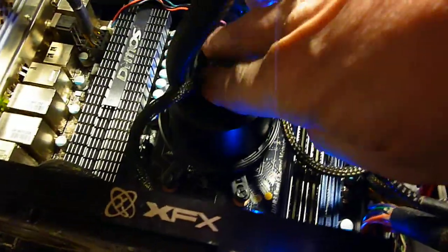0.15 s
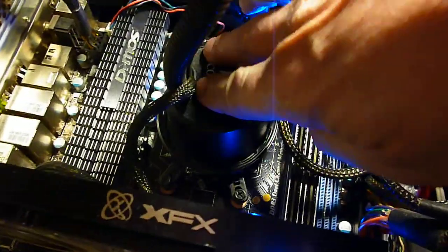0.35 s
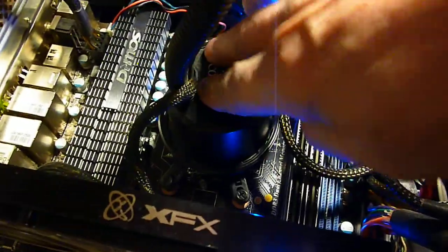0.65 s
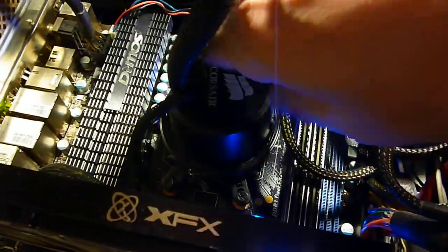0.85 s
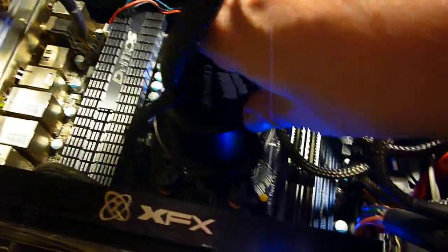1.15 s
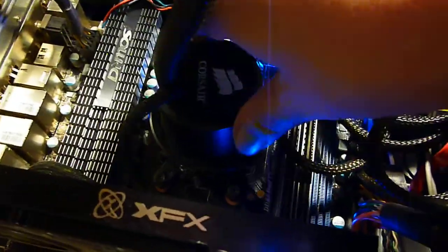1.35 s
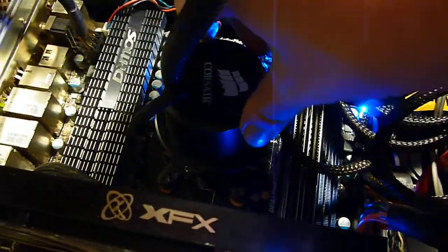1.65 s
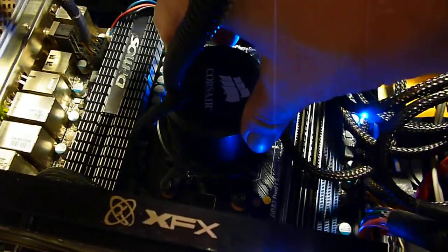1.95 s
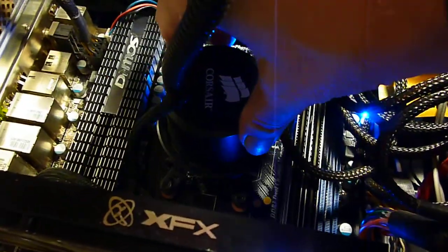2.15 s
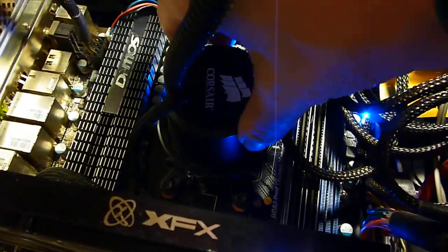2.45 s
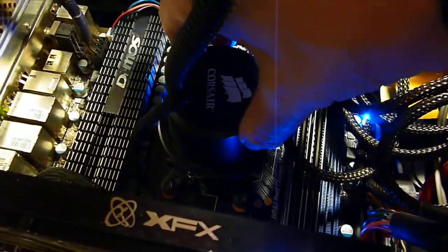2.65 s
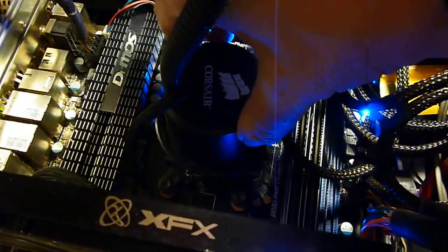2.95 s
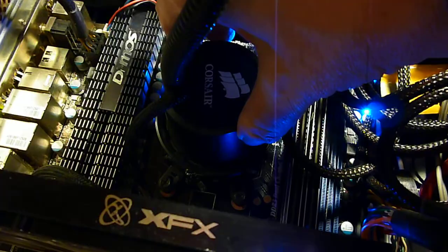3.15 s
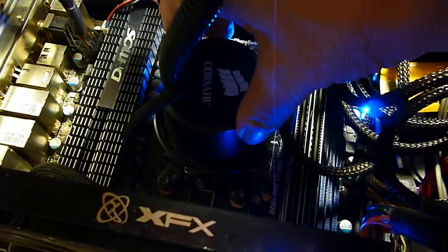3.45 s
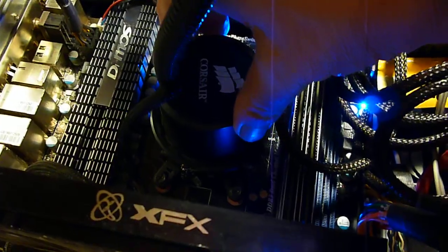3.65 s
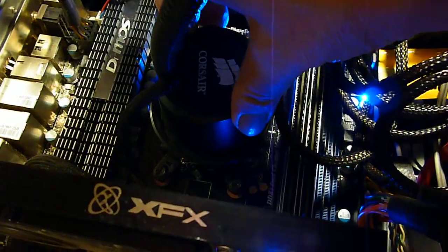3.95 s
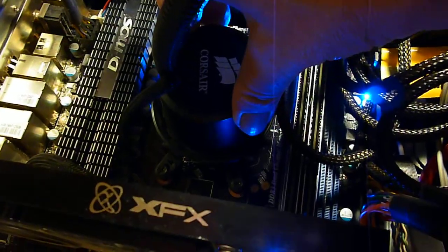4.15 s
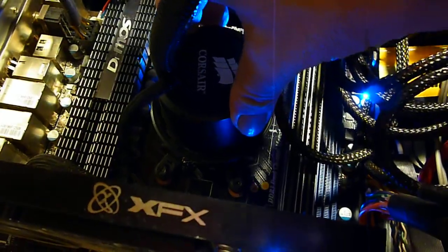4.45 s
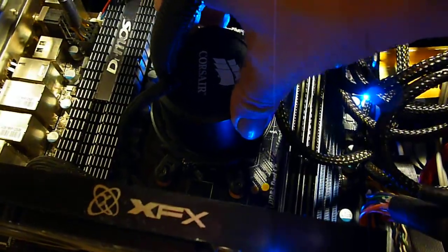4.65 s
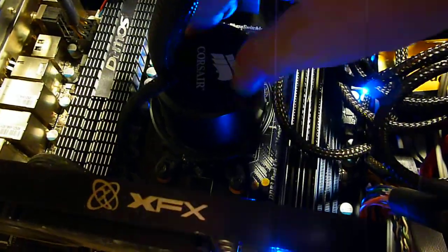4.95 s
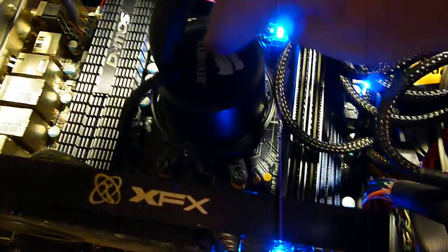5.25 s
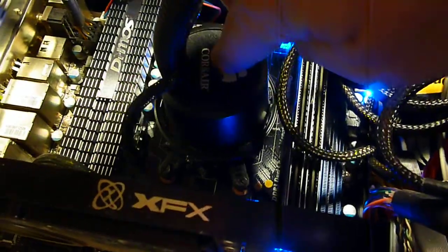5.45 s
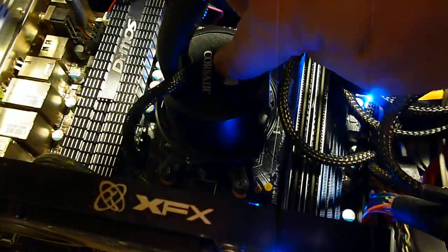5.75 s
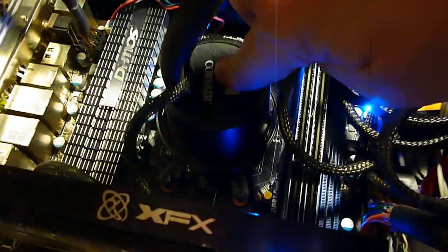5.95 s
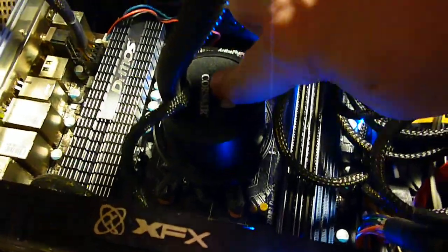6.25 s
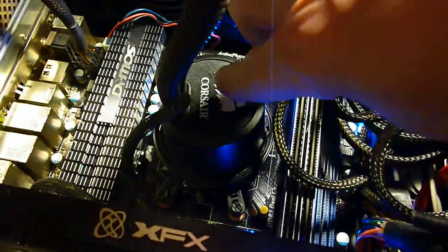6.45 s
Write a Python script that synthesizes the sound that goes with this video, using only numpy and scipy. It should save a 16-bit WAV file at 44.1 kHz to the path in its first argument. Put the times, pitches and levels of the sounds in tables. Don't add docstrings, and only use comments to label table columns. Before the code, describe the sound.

A small worn pump buzzes loudly close to the microphone inside a computer case, already running at the start and never stopping. Its hum is nasal and mid-pitched, around 500 Hz, pulsing about fifty times a second, with bright gritty bearing rattle and thin metallic ringing above. At about 0.4 to 1 seconds the tone dips and changes colour under the hand, then holds fairly steady until 2.4. Around 2.5 it wavers, and near 3.2 it rises slightly while the rattle thins and returns. From 3.6 the rotor bogs down; from 3.8 to 4.6 rapid hollow knocks and a singing housing growl slow to roughly thirty-five a second. It speeds up from 4.7, regaining its buzz by 5.3. A smaller sag with rougher, brighter scraping comes around 6.2, then recovers before the end at 6.6. Fan hiss, low rumble and faint steady whines remain behind.

```python
import sys
import numpy as np
from scipy import signal
from scipy.fft import rfft, irfft
from scipy.io import wavfile
from scipy.ndimage import uniform_filter1d

SR = 44100
rng = np.random.default_rng(int(sys.argv[2]) if len(sys.argv) > 2 else 0)


def put_to_file(sound):
    columns = np.atleast_2d(sound).T
    safe = np.clip(columns, -1, 1)
    whole_steps = np.round(safe * 32767)
    wavfile.write(sys.argv[1], SR, whole_steps.astype(np.int16))


def decibels_to_gain(level_db):
    exponent = np.asarray(level_db, float) / 20
    return 10 ** exponent


N = 291501

# (time [s], pulse depth [dB], looseness [scatter of contacts, turns / 1000])
HAND_GRIP = [(0, 5.5, 0.12), (.25, 11.5, 0.71), (.5, 6, 0.47), (1.301, 6.5, 0.17), (1.598, 4, 0.19),
             (2.1, 7, 0.14), (2.499, 6.5, 0.59), (3.001, 16, 0.6), (3.3, -7.5, 0.19), (3.6, 7, 1.7),
             (4.1, 2, 1.8), (4.35, 6.5, 2.8), (5.05, 10.5, 1.5), (5.35, 3.5, 0.37), (5.652, 4, 0.087),
             (5.9, 4.5, 0.75), (6.2, 2.5, 0.66), (6.61, 8, 0.36)]
# (time [s], drag level [dB], brightness [dB])
WALL_LEAN = [(0, -51, 5), (.4, -48, 0), (.8, -53, -2), (1.8, -53, 0), (2.5, -48.5, 0), (3.4, -49.5, 0.5),
             (3.62, -38, 5.5), (3.73, -46, -2), (3.8, -58, 6.5), (3.97, -57, -2), (4.1, -62, -3),
             (4.25, -57, 1), (4.42, -57, 5), (4.6, -57, -2), (4.66, -40, -11), (4.78, -42.5, -8),
             (4.9, -38, -9), (5.02, -42.5, -7), (5.2, -58, 1), (5.5, -48, 9), (5.85, -46, 4.5),
             (6.08, -52, -4), (6.19, -42.5, 9.5), (6.3, -51.5, -2), (6.61, -40, 2.5)]
ROUGH_SPOTS = [-0.51, -0.259, 0]


def level(x, db):
    return x * decibels_to_gain(db) / np.sqrt(np.mean(x ** 2))


def band(x, hz, width_hz):
    return signal.lfilter(*signal.iirpeak(hz, hz / width_hz, SR), x)


def colour(x, points):
    hz, db = np.transpose(points)
    log_hz = np.log(np.fft.rfftfreq(4096, 1 / SR) + 1)
    log_gain = np.interp(log_hz, np.log(hz), db) * np.log(10) / 20
    cepstrum = irfft(log_gain)
    cepstrum[1:2048] *= 2
    cepstrum[2049:] = 0
    return signal.fftconvolve(x, irfft(np.exp(rfft(cepstrum))))[:N]


def curves(table):
    s, *columns = np.transpose(table)
    return [np.interp(np.arange(N) / SR, s, c) for c in columns]


def per_turn(turns, s, values):
    turn_s = np.interp(np.arange(int(turns[-1]) + 2), turns, np.arange(N) / SR)
    return np.interp(turn_s, s, values)


def walk(steps, size, count):
    w = rng.standard_normal((count, size))
    w = uniform_filter1d(uniform_filter1d(w, int(steps)), int(steps))
    return w / w.std()


def drifts(rate, count):
    w = walk(100 / rate, size=700, count=count)
    return np.array([np.interp(np.arange(N) / SR, np.arange(700) / 100, row) for row in w])


def contacts(turns, angle, db, creep, creep_db, shake, shake_db, memory):
    count, size = db.shape
    at = angle[:, None] + np.arange(size)
    at = at + creep * walk(memory, size, count) + shake * rng.standard_normal((count, size))
    force_db = db + creep_db * walk(memory, size, count) + shake_db * rng.standard_normal((count, size))
    place = np.interp(at, turns, np.arange(N)).ravel()
    force = decibels_to_gain(force_db).ravel() * (at.ravel() < turns[-1])
    taps = np.floor(place)[:, None] + np.arange(-5, 7)
    away = taps - place[:, None]
    click = np.sinc(away) * np.cos(np.pi * away / 12) ** 2
    taps = np.clip(taps, 0, N - 1).astype(int)
    return np.bincount(taps.ravel(), (force[:, None] * click).ravel(), N)


def shaft_speed():
    # (time [s], shaft speed [turns/s])
    speed = [(0, 52.2), (.31, 52.22), (.52, 49.5), (.72, 49.8), (1.05, 50.78), (2.03, 50.79), (2.5, 49.92),
             (3.2, 55.22), (3.45, 54.53), (3.69, 51), (3.8, 47.9), (3.92, 46.1), (4.2, 39.9), (4.44, 35.93),
             (4.62, 35.28), (4.8, 40.8), (4.93, 43.68), (5.28, 48.79), (5.67, 50.27), (5.9, 49.17),
             (6.22, 46.57), (6.32, 46.74), (6.61, 49.5)]
    inertia_s = .1
    return uniform_filter1d(curves(speed)[0], int(inertia_s * SR))


def shifts():
    # (time [s], length [s], hum change [dB], rattle change [dB])
    finger_moves = [(0.37, 0.02, -1.5, 1), (0.42, 0.041, -8.5, -2), (0.77, 0.044, -1.5, 0),
                    (0.92, 0.14, -6, 0), (1.223, 0.031, -3, -1.5), (1.666, 0.072, 0, -1),
                    (2.532, 0.088, -3, 2.5), (2.615, 0.081, -7.5, -2.5), (3.305, 0.036, 0.5, 1),
                    (3.43, 0.062, 3, -0.5), (3.714, 0.046, 0.5, 0), (3.89, 0.014, 5, -2.5),
                    (4.203, 0.042, 5.5, 1), (4.312, 0.038, 7, -4.5), (4.682, 0.035, 4, -4.5),
                    (4.936, .1, 2.5, -3.5), (5.12, 0.04, 1.5, -1), (5.475, 0.077, 1.5, 2),
                    (5.69, 0.046, -1.5, 0), (6.182, 0.037, -2, 2), (6.272, 0.032, 2.5, 0.5),
                    (6.389, 0.052, -2, -2)]
    s, length, *db = np.transpose(finger_moves)
    grid = np.arange(0, N, 200)
    bump = np.exp(-((grid / SR - s[:, None]) / length[:, None]) ** 2)
    return [np.interp(np.arange(N), grid, d @ bump) for d in db]


def housing(shaft_hz, shift_db):
    # (time [s], resonance [Hz], hum level [dB], hose ring level [dB])
    pressure = [(0, 504.4, -32.5, -48.5), (.3, 489, -32, -49), (.37, 474, -30.5, -44),
                (.45, 526, -38, -37.5), (.72, 530, -36, -38.5), (1.05, 453.6, -35.5, -46.5),
                (2.03, 455.4, -34, -45), (2.4, 515, -43, -37.5), (2.62, 468.6, -29, -38),
                (2.75, 488, -31.5, -45.5), (3.2, 542, -28, -41), (3.62, 504, -31, -37),
                (3.8, 530, -47, -36.5), (4.72, 524, -41, -41.5), (4.9, 480, -38.5, -55),
                (5.02, 501.4, -42, -46), (5.14, 500, -37.5, -36.5), (5.28, 504.7, -32, -39.5),
                (5.9, 515.4, -34, -38), (6.15, 448, -39, -37.5), (6.21, 460, -42, -35.5),
                (6.27, 470, -43, -33), (6.36, 492.8, -32.5, -35.5), (6.61, 518, -32, -39)]
    hose_share_db = (-15.5, -3, 1.5)
    width_hz = 36.3
    edge_hz = 506
    centre_hz, hum_db, hose_db = curves(pressure)

    def strength(m, share_db):
        near = decibels_to_gain(hum_db) / np.sqrt(1 + ((m * shaft_hz - centre_hz) / width_hz) ** 4)
        lent = decibels_to_gain(hose_db + share_db) / (1 + (edge_hz / (m * shaft_hz)) ** 16)
        return 20 * np.log10(np.hypot(near, lent)) + shift_db

    strong_db = {m: strength(m, share_db) for m, share_db in zip((9, 10, 11), hose_share_db)}
    strong_db[13] = strength(13, 0)
    return strong_db


def hum(turns, shaft_hz, strong_db, board_db):
    # (frequency [multiples of board_step_hz], level [dB])
    board_response = [(1, -30.5), (2, -28), (3, -19), (4, -14), (5, -20), (6, -20.5), (7, -13.5),
                      (8, -26.5), (9, -8.5), (10, -20), (11, -8.5), (12, -11), (13, -9), (14, -8.5),
                      (15, -13), (16, -19.5), (17, -12), (18, -30), (19, -15.5), (20, -33.5), (21, -12.5),
                      (22, -26), (23, -23), (24, -19.5), (25, -17.5), (26, -15), (27, -22), (28, -16),
                      (29, -28.5), (30, -19.5), (31, -40.5), (32, -17), (33, -38.5), (34, -36), (35, -21),
                      (36, -41.5)]
    board_step_hz = 50.75
    # (time [s], level [dB])
    grip_damping = [
        (0, 5),
        (2.5, 5),
        (3.0, -4),
        (3.7, -5.5),
        (3.78, 11),
        (4.66, 3),
        (5.1, -2),
        (5.6, -1),
        (5.95, 2),
        (6.61, -6.5),
    ]
    step, response_db = np.transpose(board_response)
    count = len(step)
    grid, coarse = np.arange(0, N, 400), np.arange(0, N, 6)
    waver = walk(33, size=len(grid), count=2 * count).reshape(2, count, -1)
    start = rng.random(count)
    start[7:13] = -.3 * step[7:13] + 0.042 * (step[7:13] - 10) ** 2
    board_db = board_db[grid] - 0.59 * np.maximum(48 - shaft_hz[grid], 0)
    seized_db = np.interp(grid / SR, *np.transpose(grip_damping))
    upper_db = 0.36 * strong_db[13][grid] + 0.74 * board_db + 2.5 + seized_db
    out = 0
    for k, m in enumerate(step):
        if m in strong_db:
            own_db = strong_db[m][grid] + .3 * seized_db + waver[1, k]
        else:
            own_db = np.interp(m * shaft_hz[grid] / board_step_hz, step, response_db) + 3.3 * waver[1, k]
            own_db = own_db + (upper_db if 12 <= m <= 18 else board_db)
        phase = m * turns[coarse] + np.interp(coarse, grid, start[k] + 0.11 * waver[0, k])
        gain = np.interp(coarse, grid, np.sqrt(2) * decibels_to_gain(own_db))
        out = out + gain * np.sin(2 * np.pi * phase)
    return signal.resample_poly(out, 6, 1)[:N]


def rattle(turns, modes, db, heavy_side, depth, braked, count):
    # (time [s], extra pulse depth [dB])
    one_sided = [
        (4.2, 0.5),
        (4.4, 3),
        (5.0, 3.5),
        (5.15, 1),
    ]
    s, depth_db, loose = np.transpose(HAND_GRIP)
    depth_db = depth * per_turn(turns, s, depth_db) + braked * per_turn(turns, *np.transpose(one_sided))
    angle = (np.arange(count) + rng.random(count)) / count
    side = np.cos(2 * np.pi * (angle - heavy_side))[:, None]
    strength = depth_db * side - 0.045 * depth_db ** 2 + 3.8 * rng.standard_normal((count, 1))
    shake = 0.00096 * np.abs(per_turn(turns, s, loose))
    grit = contacts(turns, angle, strength, creep=0.0029, creep_db=2.0, shake=shake, shake_db=0.5, memory=25)
    ring = sum((-1) ** k * decibels_to_gain(m_db) * band(grit, hz, w) for k, (hz, w, m_db) in enumerate(modes))
    centre_hz = np.mean(np.array(modes)[:, 0])
    broad = band(band(grit, centre_hz, 0.17 * centre_hz), centre_hz, 0.12 * centre_hz)
    ring = level(ring, 0) + level(broad, -4.5)
    return level(ring, 0) * decibels_to_gain(db)


def ticks(turns, db):
    angle = 0.5 + 0.11 * rng.random(5)
    even_db = np.zeros((5, int(turns[-1]) + 2))
    hits = contacts(turns, angle, even_db, creep=0.031, creep_db=5, shake=.004, shake_db=5, memory=6.5)
    return level(band(band(hits, 6400, 2100), 5700, 2500), 0) * decibels_to_gain(db)


def bearing_ring(turns):
    # (start [s], end [s], mode [Hz], level [dB])
    firm_spots = [(0, 0.304, 4746, -44), (0.848, 1.02, 4810, -40), (1.02, 1.182, 4817, -37.5),
                  (1.26, 1.7, 4815, -38), (1.724, 2.08, 4760, -47), (2.078, 2.545, 4815, -42.5),
                  (2.553, 2.75, 4818, -52), (3.21, 3.674, 4780, -43), (3.85, 4.08, 4827, -48),
                  (5.4, 5.9, 4790, -47), (6.3, 6.61, 4828, -46), (0, .58, 5674, -41.5),
                  (2.0, 2.3, 5630, -51), (5.302, 5.721, 5747, -48), (5.845, 6.3, 5650, -46.5),
                  (.27, 0.755, 6510, -40.5), (1.1, 1.248, 6420, -46), (6.35, 6.607, 6460, -48.5),
                  (0.853, 1.1, 5960, -44), (1.28, 1.4, 5960, -46.5), (2.094, 2.599, 5960, -44),
                  (3.55, 3.848, 5960, -45), (5.75, 6.0, 5960, -43), (1.26, 1.7, 5510, -49),
                  (5.08, 5.55, 5510, -46), (6.4, 6.609, 5510, -45)]
    width_hz, rest_db = 70, -53
    lag_s = .0043
    even_db = np.zeros((1, int(turns[-1]) + 2))
    hits = contacts(turns, np.array([.6]), even_db, creep=0.0036, creep_db=-4.0,
                    shake=0.00027, shake_db=1.5, memory=19)
    grid = np.arange(0, N, 200)
    out = 0
    for k, mode_hz in enumerate(sorted({round(row[2], -2) for row in firm_spots})):
        rows = [row for row in firm_spots if round(row[2], -2) == mode_hz]
        hz = np.mean([row[2] for row in rows])
        gain = sum(decibels_to_gain(db) * (grid / SR > start) * (grid / SR <= end) for start, end, _, db in rows)
        gain = np.interp(np.arange(N), grid, uniform_filter1d(gain, size=10) + decibels_to_gain(rest_db))
        late = np.roll(hits, int(k * lag_s * SR))
        out = out + level(band(band(late, hz, width_hz), hz, 6.3 * width_hz), 0) * gain
    return out


def blows(turns):
    # (time [s], peak level [dB], ring [Hz])
    strikes = [(3.768, -27, 635), (3.79, -17, 630), (3.81, -15, 633), (3.831, -13, 638),
               (3.852, -14.5, 630), (3.873, -17, 633), (3.894, -14.5, 650), (3.915, -12, 638),
               (3.931, -19.5, 738.3), (3.937, -11.5, 630), (3.952, -15, 712), (3.959, -14.5, 634),
               (3.974, -15, 644), (3.981, -19, 641), (3.997, -18, 657), (4.005, -10.5, 646),
               (4.023, -18.5, 580), (4.033, -18.5, 796), (4.056, -20, 800), (4.081, -15.5, 614),
               (4.104, -19.5, 684), (4.129, -19, 574), (4.145, -23, 565), (4.152, -21, 654.4),
               (4.179, -25, 530), (4.204, -20, 643), (4.233, -24, 773), (4.258, -19.5, 770),
               (4.285, -22.5, 541), (4.31, -20.5, 538.5), (4.33, -24.5, 662.3), (4.337, -20.5, 768),
               (4.357, -21.5, 674), (4.366, -19.5, 783), (4.385, -19, 638), (4.393, -17.5, 771.5),
               (4.412, -17.5, 635), (4.421, -18.5, 760), (4.441, -21.5, 622), (4.449, -16.5, 760),
               (4.469, -13.5, 630), (4.477, -18.5, 772.5), (4.498, -13.5, 610), (4.506, -18.5, 780),
               (4.526, -15.5, 610), (4.534, -18.5, 790), (4.562, -17.5, 770), (4.59, -16.5, 632),
               (4.618, -21, 633)]
    # (time [s], level [dB])
    linger = [
        (3.75, -4),
        (3.9, 0.5),
        (4.05, 3.5),
        (4.2, 4),
        (4.35, 3.5),
        (4.5, 1),
        (4.56, -3),
        (4.64, -7),
    ]
    sing_spots_db = [-3.5, -2, 0]
    early_s, early_turn = .013, .3
    rise_s, fall_s, trim_db, crack_db = 0.001, 0.0026, -2.5, -15.5
    s, db, hz = np.transpose(strikes)
    t = np.arange(N) / SR
    early = np.append(np.diff(s) < early_s, False)
    turn = np.interp(s[~early], t, turns)
    count = np.arange(len(turn))
    spot = count + np.polyval(np.polyfit(count, turn - count, 5), count)

    def place(turn):
        return (np.interp(turn, turns, t) * SR).astype(int)

    at = place(spot[np.cumsum(~early) - ~early] - early_turn * early)
    for kind in (early, ~early):
        db[kind] = uniform_filter1d(db[kind], size=2)
        hz[kind] = uniform_filter1d(hz[kind], size=5)
    age = np.arange(900) / SR
    shape = (1 - np.exp(-age / rise_s)) * np.exp(-age / fall_s)
    crack = decibels_to_gain(crack_db) * np.exp(-age / .0008) * np.sin(2 * np.pi * 1400 * age)
    body = shape / shape.max() * np.sin(2 * np.pi * hz[:, None] * age)
    ring = decibels_to_gain(db + trim_db)[:, None] * (body + crack)
    ring = np.bincount((at[:, None] + np.arange(900)).ravel(), ring.ravel(), N)
    force = decibels_to_gain(db[~early])
    hits = sum(np.bincount(place(spot + angle), force * decibels_to_gain(spot_db), N)
               for angle, spot_db in zip(ROUGH_SPOTS, sing_spots_db))
    low, high = wall(hits)
    sing = low + high * decibels_to_gain(0.76 * curves(WALL_LEAN)[1])
    sing = sing * np.sqrt(np.mean(ring ** 2) / np.mean(sing ** 2)) * decibels_to_gain(curves(linger)[0])
    return signal.sosfilt(signal.butter(3, 450, "high", fs=SR, output="sos"), ring + sing)


def drag(turns):
    drag_spots_db = [-2, -6, -0.5]
    main_knock_s = 3.871
    db, bright_db = curves(WALL_LEAN)
    angle = np.interp(main_knock_s * SR, np.arange(N), turns) % 1 + np.array(ROUGH_SPOTS)
    strength = np.array(drag_spots_db)[:, None] + np.zeros(int(turns[-1]) + 2)
    hits = contacts(turns, angle, strength, creep=.008, creep_db=2, shake=.003, shake_db=1.2, memory=8)
    low, high = wall(hits)
    return level(low, 0) * decibels_to_gain(db) + level(high, -1.5) * decibels_to_gain(db + bright_db)


def wall(hits):
    # (mode [Hz], width [Hz], level [dB])
    lower_modes = [(470, 50, -2.5), (543.6, 76, -2), (632, 79, 4.5)]
    upper_modes = [(709, 96, -9), (780, 60, 2), (874, 57, -3.5), (977, 110, -17.5)]
    return [sum((-1) ** k * decibels_to_gain(db) * band(band(hits, hz, w), hz, 2 * w) for k, (hz, w, db) in enumerate(modes))
            for modes in (lower_modes, upper_modes)]


def thrum():
    from_s, hz, width_hz, thrum_db = 2.58, 102, 65, -54.5
    on = uniform_filter1d(1. * (np.arange(N) > from_s * SR), 4000)
    return on * level(band(band(rng.standard_normal(N), hz, width_hz), hz, 2 * width_hz), thrum_db)


def fans(hiss_db, rumble_db):
    # (frequency [Hz], density [dB per Hz])
    air_spectrum = [(18, -58), (30, -31.5), (53, -32.5), (179, -6), (303, -11), (403, -4.5), (499, -7.5),
                    (906, -7.5), (1430, -7), (2980, -14.5), (5810, -13.5), (6710, -11), (8930, -38),
                    (11600, -75.5), (19600, -120)]
    # (frequency [Hz], rms level [dB])
    motor_whines = [(1400, -51), (1425, -69), (1782, -56.5), (2138, -55)]
    # (time [s], tone [Hz])
    tone_track = [
        (0, 1959),
        (1.05, 1970),
        (2.13, 1959),
        (6.61, 1992),
    ]
    flutter = np.interp(np.arange(N), np.arange(200) * N / 199, walk(3, size=200, count=1)[0])
    air = colour(rng.standard_normal(N), air_spectrum)
    low = signal.sosfilt(signal.butter(2, 350, fs=SR, output="sos"), air)
    rumble = level(low, 0) * decibels_to_gain(rumble_db - 3.0)
    hiss = level(air - low, 0) * decibels_to_gain(hiss_db + 2.5 + .5 * flutter)
    shade_db = hiss_db - hiss_db.mean()
    drift = np.cumsum(1 + 0.002145 * flutter) / SR
    whine = sum(np.sqrt(2) * decibels_to_gain(db) * np.sin(2 * np.pi * hz * drift) for hz, db in motor_whines)
    tone_hz, = curves(tone_track)
    tone_db = -53 + 1.8 * shade_db
    tone = np.sqrt(2) * decibels_to_gain(tone_db) * np.sin(2 * np.pi * np.cumsum(tone_hz) / SR)
    return rumble + hiss + tone + whine * decibels_to_gain(shade_db)


def scene():
    # (time [s], rattle level [dB], tilt towards the shell's upper modes [dB])
    rub = [(0.0, -31.5, 2.5), (0.37, -30.5, 8), (0.81, -35, 1.5), (0.96, -32, 4.5), (1.36, -29.5, 0),
           (1.95, -33, 4), (2.15, -29, 4.5), (2.78, -37, -0.5), (3.18, -41, -5.5), (3.29, -32.5, 4),
           (4.03, -34.5, 4), (4.16, -30, 5.5), (4.3, -31.5, 8), (4.55, -35.5, 2), (4.79, -37, 4),
           (5.02, -34, 2), (5.12, -32.5, 5.5), (5.3, -32, 4), (5.45, -33.5, 4), (5.6, -32, 1.5),
           (5.76, -30.5, 5.5), (5.93, -32, 0.5), (6.2, -33, 0.5), (6.44, -34, 3.5), (6.61, -31, 6)]
    # (mode [Hz], width [Hz], level [dB])
    bearing_modes = [(3614, 182, -6.5), (3923, 22, 2.5), (4140, 290, -11), (4700, 150, -1), (5120, 370, -2)]
    shell_modes = [(5495, 36, -2.5), (5683, 86, -3.5), (5960, 80, -1.5), (6303, 360, -4), (6580, 41, -12.5),
                   (6960, 94, -8.5), (7054, 450, -7.5), (8560, 85, -27)]
    # (time [s], level [dB])
    hand_shade = [(0.0, -39.5), (0.31, -38.5), (0.51, -43.5), (1.36, -38), (2.61, -39), (3.16, -36),
                  (3.68, -40), (4.21, -38), (4.29, -41), (4.6, -39), (4.66, -43), (5.38, -37), (5.91, -41),
                  (6.61, -39)]
    # start [s], end [s]
    seized_span = (3.62, 4.62)

    shaft_hz = shaft_speed()
    turns = np.cumsum(shaft_hz) / SR
    rub_db, tilt_db = curves(rub)
    hum_shift_db, rub_shift_db = shifts()
    rub_db = rub_db + rub_shift_db
    low_db = rub_db - 4.5 - tilt_db / 2
    high_db = rub_db - 5 + tilt_db / 2
    hiss_db, = curves(hand_shade)

    tone = hum(turns, shaft_hz, housing(shaft_hz, hum_shift_db), board_db=hiss_db + 3)
    knocks = blows(turns) + drag(turns)
    low = rattle(turns, bearing_modes, low_db, heavy_side=0.47, depth=0.38, braked=1, count=24)
    high = rattle(turns, shell_modes, high_db, heavy_side=0.57, depth=0.87, braked=0, count=30)
    high = high + ticks(turns, 0.61 * high_db - 40)
    flicker = decibels_to_gain(1.2 * drifts(14, count=2))

    t = np.arange(N) / SR
    seized = uniform_filter1d(1. * (t > seized_span[0]) * (t < seized_span[1]), 2000)
    seized_db = -8.5 * seized
    rumble_db = -42 + (hiss_db - hiss_db.mean()) + seized_db
    rumble_db = rumble_db - 1.5 * drifts(1.4, count=1)[0]
    case = fans(hiss_db, rumble_db) + thrum() * decibels_to_gain(seized_db)

    low = low + bearing_ring(turns)
    flutter_db = np.abs(curves(HAND_GRIP)[1]) * drifts(25, count=1)[0]
    pump = knocks + tone * decibels_to_gain(flutter_db)
    return (pump + low * flicker[0] + high * flicker[1] + case)[None]


def low_pass(x):
    return signal.sosfilt(signal.butter(12, 9080, fs=SR, output="sos"), x)


def record(dry):
    notch_hz, notch_width_hz, offset = 4395, 70, .0046
    x = dry - band(dry[0], notch_hz, notch_width_hz)
    x = x - band(x[0], notch_hz, notch_width_hz / 2)
    x = signal.sosfilt(signal.butter(6, 7600, fs=SR, output="sos"), x)
    return low_pass(x + offset)


dry = scene()
out = record(dry)
put_to_file(out)
```